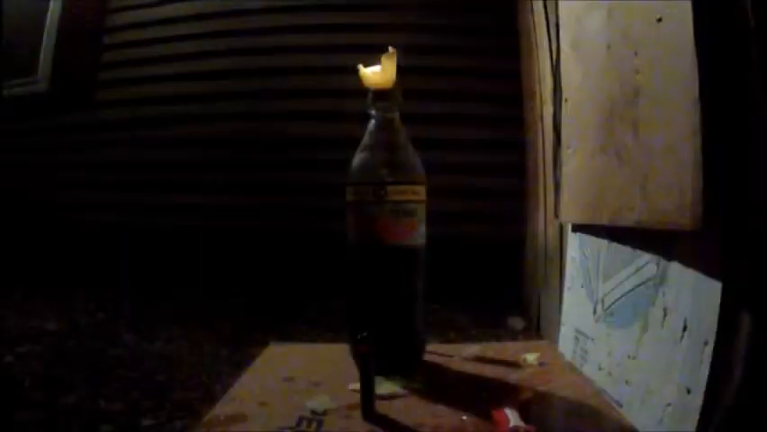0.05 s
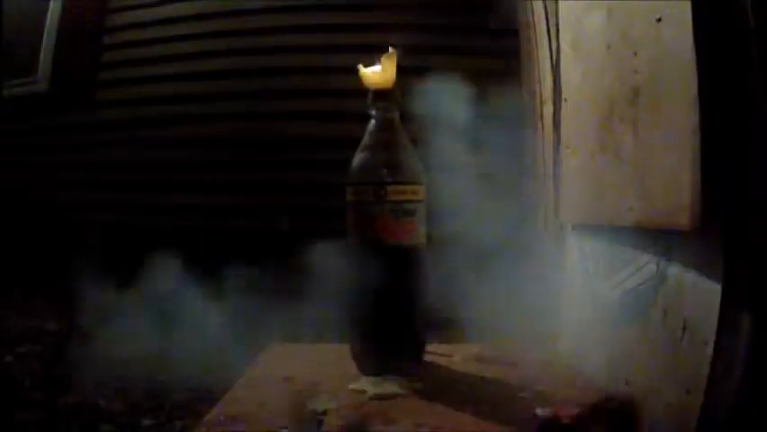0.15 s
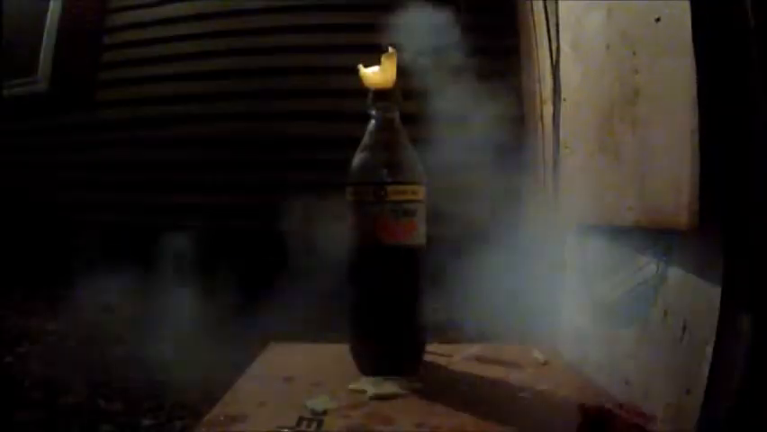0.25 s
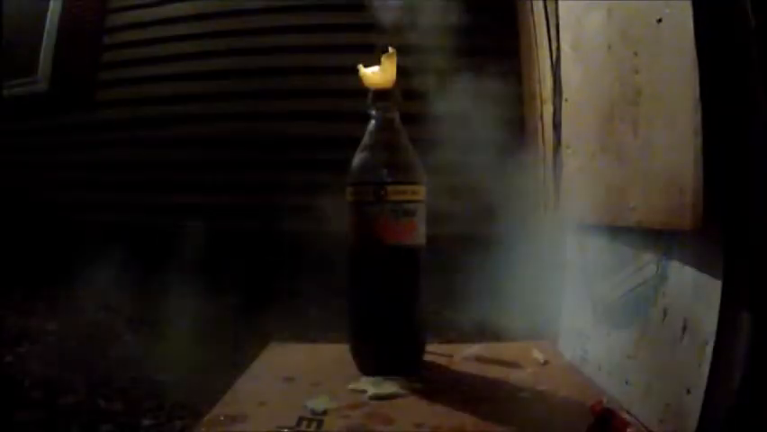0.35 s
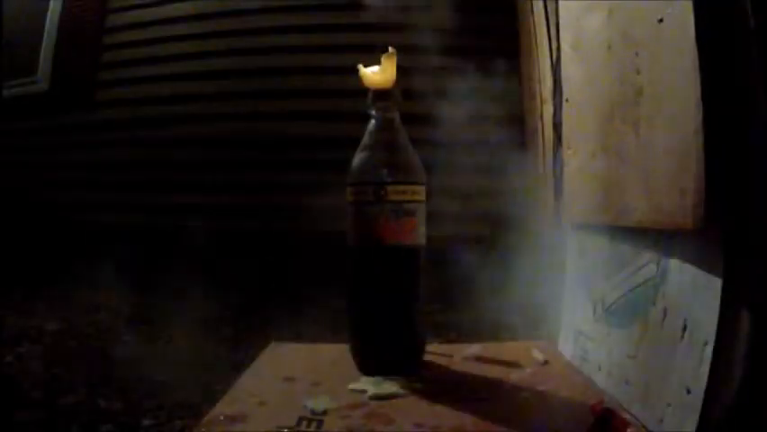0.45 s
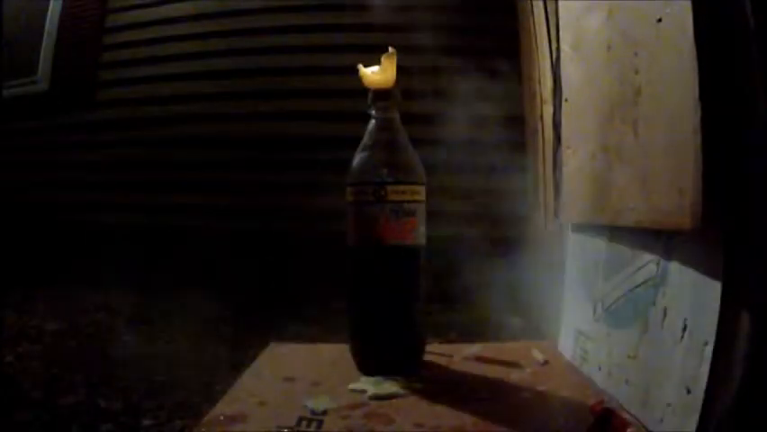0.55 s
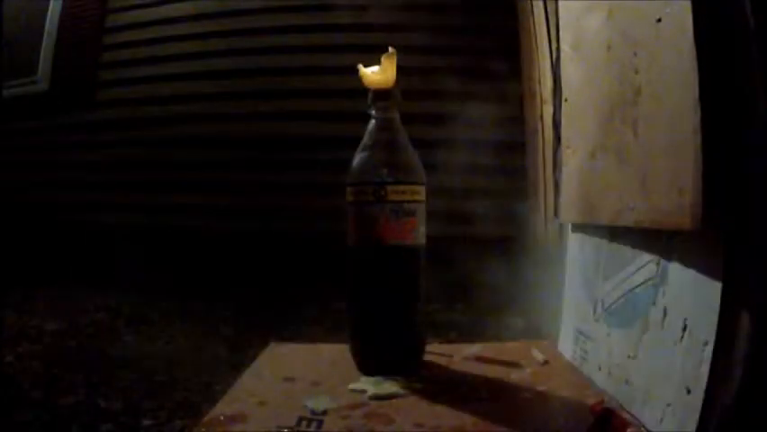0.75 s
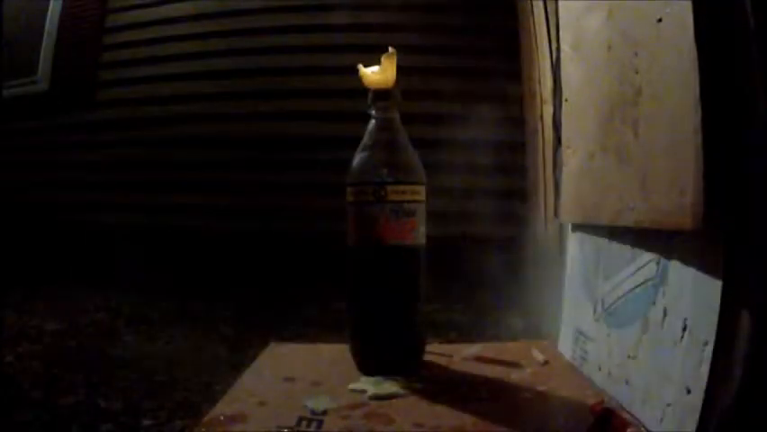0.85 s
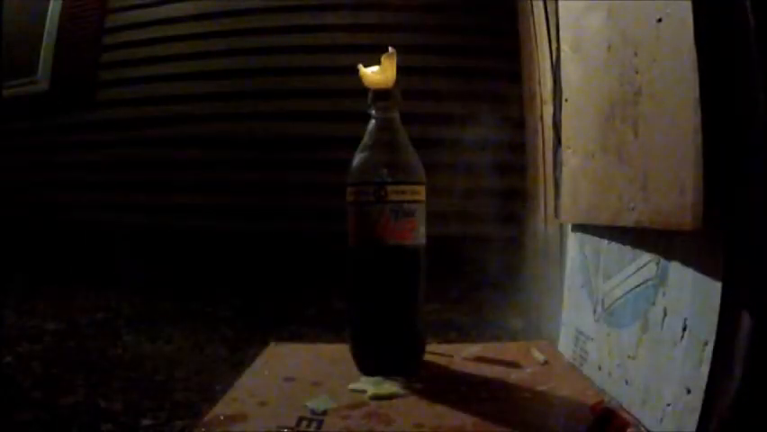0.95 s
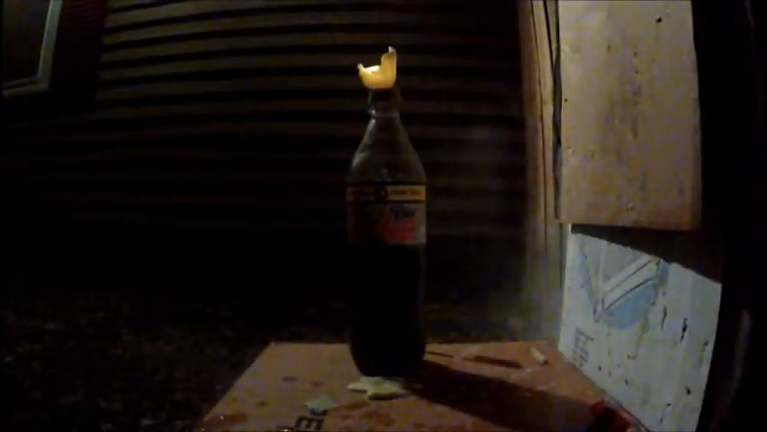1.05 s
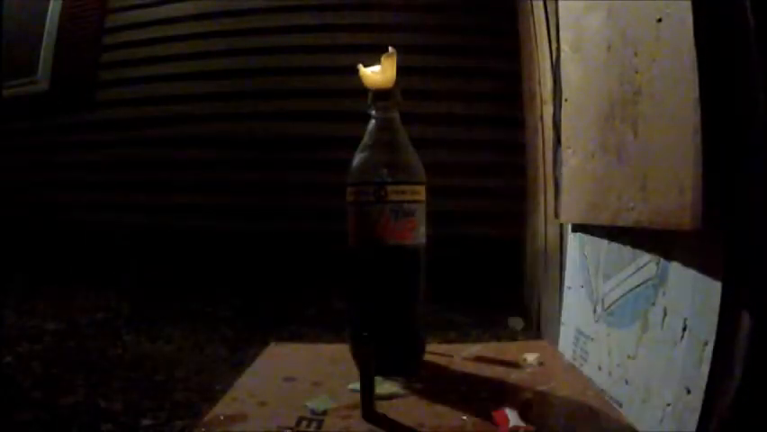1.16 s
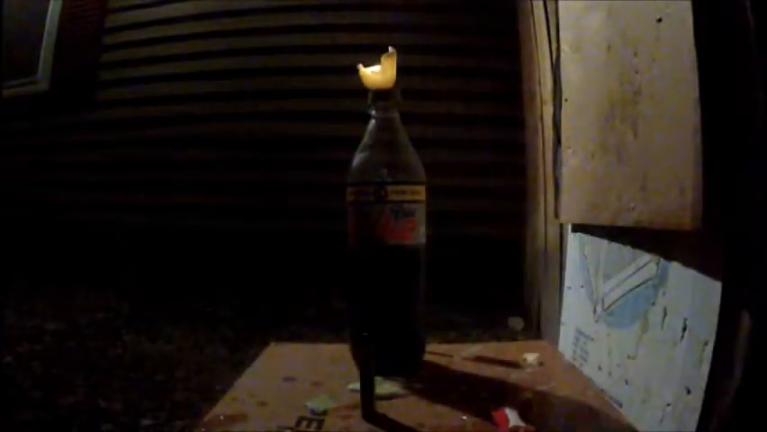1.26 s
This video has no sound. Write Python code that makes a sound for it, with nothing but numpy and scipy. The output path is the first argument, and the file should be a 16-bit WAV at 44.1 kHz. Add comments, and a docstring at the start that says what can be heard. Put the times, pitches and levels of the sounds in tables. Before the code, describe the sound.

A butane lighter bursts close by: gas starts hissing at about 0.2 seconds, and a sharp, loud pop follows almost at once. The hiss fades by 0.5 seconds while the plastic body knocks and rattles on a board, hardest around 0.4 to 0.5, settling by 0.6. Faint splinters tick afterwards, the last ringing briefly just after 1 second. A low distant hum lies underneath in the quiet yard.

```python
"""A butane lighter splits, hisses and bursts on a board, close by, at night, over a low distant hum.
At 0.18 s gas starts to jet from the split; it hisses for a third of a second.
At 0.24 s the case bursts with a push, a crack and two after-pulses; the body knocks and rattles to rest.
Small splinters tick among the knocks and afterwards; the last one rings briefly just after 1 s.
Near walls answer each sound, and a faint dull reverberation dies away in the yard."""
import sys
import numpy as np
from scipy import signal
from scipy.fft import rfft, irfft, next_fast_len
from scipy.io import wavfile
from scipy.ndimage import map_coordinates

SR = 44100
rng = np.random.default_rng(int(sys.argv[2]) if len(sys.argv) > 2 else 0)


def log_audio(samples):
    """Write samples as a 16-bit WAV file to the path given in sys.argv[1]."""
    # one column per channel
    frames = np.atleast_2d(samples).T
    # limit to full scale, then quantise
    limited = np.clip(frames, -1, 1)
    pcm = np.round(limited * 32767).astype(np.int16)
    wavfile.write(sys.argv[1], SR, pcm)


N = 57330


def amp(db):
    """Decibels to amplitude ratio."""
    return 10 ** (np.asarray(db) / 20)


def unit(x):
    """Normalisation to rms 1."""
    return x / np.sqrt(np.mean(x ** 2) + 1e-20)


def clock():
    """The time of each sample in seconds."""
    return np.arange(N) / SR


def since(start_s):
    """Time elapsed after an onset, zero before."""
    return np.maximum(clock() - start_s, 0)


def curve(rows):
    """Linear interpolation of (time_s, value) rows at each sample."""
    return np.interp(clock(), *np.transpose(rows))


def colour(spectrum, hz):
    """Spectral envelope: gain from (frequency_hz, level_db) rows on a log axis."""
    f, db = np.transpose(spectrum)
    return amp(np.interp(np.log(hz + 1), np.log(f + 1), db))


def filtered(x, response):
    """Linear filtering: the spectrum of x times a frequency response."""
    size = next_fast_len(N + SR // 2)
    return irfft(rfft(x, size) * response(np.fft.rfftfreq(size, 1 / SR)), size)[..., :N]


def noise(response):
    """Filtered white noise of rms 1."""
    return unit(filtered(rng.standard_normal(N), response))


def wobble(rate_hz):
    """Random modulation: a spline through rate_hz knots a second."""
    return map_coordinates(rng.standard_normal(2048), [clock() * rate_hz], mode="wrap")


def strike(t, t60, rise_s):
    """Exponential decay after a quick rise, peak 1."""
    shape = (1 - np.exp(-t / rise_s)) * np.exp(-np.log(1000) * t / t60)
    return shape / (shape.max() + 1e-20)


def thump(t, hz, t60, rise_s):
    """Damped oscillation that swells over the time of contact."""
    shape = (1 - np.exp(-t / rise_s)) * strike(t, t60, rise_s)
    return shape / (shape.max() + 1e-20) * np.sin(2 * np.pi * hz * t)


# partials of the hum: harmonic_number, level_db
HUM_PARTIALS = [(1, 0), (2, -19), (3, -24)]
# envelope of the hum: time_s, level_db
HUM_ENVELOPE = [(0, -39.5), (.12, -43), (.5, -41), (.8, -40.5), (1.03, -44), (1.14, -54.5), (1.21, -45)]
def distant_hum(pitch_hz=89.14, wander=0.0081):
    """A harmonic series wavers under random frequency and amplitude modulation."""
    phase = 2 * np.pi * np.cumsum(pitch_hz * (1 + wander * wobble(11))) / SR
    tone = sum(amp(db + 1.5 * wobble(8.9)) * np.sin(k * phase) for k, db in HUM_PARTIALS)
    return amp(curve(HUM_ENVELOPE)) * unit(tone)


def electronic_hiss(centre_hz=12070, width_hz=300):
    """Narrow-band noise, heard as a thin high whine."""
    return amp(-77) * noise(lambda f: np.exp(-((f - centre_hz) / width_hz) ** 2))


# spectrum of the night air: frequency_hz, level_db
AIR_SPECTRUM = [(20, -20), (40, -13.5), (62, 3), (90, -8), (135, -1.5), (200, -13), (300, -16.5),
                (430, -23.5), (620, -19), (760, -29), (950, -38), (1500, -42), (2400, -41), (4500, -48),
                (6000, -54.5), (8000, -51), (10500, -56), (14500, -54)]
def night_air():
    """Steady ambient noise, its power concentrated at low frequencies."""
    return amp(-45) * noise(lambda f: colour(AIR_SPECTRUM, f))


def side_rumble():
    """Decorrelation: faint low noise that makes the two sides differ."""
    spectrum = [(30, 7.5), (100, -11.5), (400, -22), (3000, -35), (12000, -45.5)]
    return amp(-64) * noise(lambda f: colour(spectrum, f))


# reflections from the near walls: delay_s, level_db
WALL_ECHOES = [(.0085, -19), (0.0123, -23.5), (0.03, -27)]
def yard(direct, tail_top_hz=750):
    """Early reflections add delayed copies; convolution with decaying noise adds dull reverberation."""
    echoes = filtered(direct, lambda f: sum(amp(db) * np.exp(-2j * np.pi * f * s) for s, db in WALL_ECHOES))
    tail = noise(lambda f: 1 / (1 + (f / tail_top_hz) ** 4)) * strike(clock(), t60=0.35, rise_s=0.024)
    passband_gain = np.linalg.norm(tail) * np.sqrt(SR / tail_top_hz)
    return direct + echoes + amp(-22) * signal.fftconvolve(direct, tail / passband_gain)[:N]


# modes of the board: pitch_hz, level_db, t60_s
BOARD_MODES = [(135, -5, .08), (189, -2, .10), (275, -6, .07), (335, -4, .08), (414, 0, .10),
               (505, -4, .07), (642, 0, .075), (717, -6, .06), (830, -11, .05), (960, -16, .04),
               (1310, -16, .04), (1615, -7, .055), (1725, -9, .05), (2920, -23, .04)]
def board(t, scatter_db=2):
    """Modal superposition: each excitation gives the board's modes new random weights."""
    gains = amp(scatter_db * rng.standard_normal(len(BOARD_MODES)))
    return sum(gain * amp(db) * thump(t, hz, t60, rise_s=.0006)
               for gain, (hz, db, t60) in zip(gains, BOARD_MODES))


# modes of the last splinter: pitch_hz, level_db, t60_s
PING_MODES = [(1050, -10, 0.056), (2035, -0.5, 0.032), (2146, -1.5, 0.032)]
def last_splinter(start_s=1.028):
    """Free vibration: the last piece rings briefly at its natural frequencies."""
    t = since(start_s)
    return amp(-45.5) * sum(amp(db) * thump(t, hz, t60, rise_s=0.00023) for hz, db, t60 in PING_MODES)


# ticks: start_s, level_db, t60_s, resonance_hz, board_ring_db
# The one at 0.2452 s is a sharp echo of the burst's crack; the rest are splinters snapping and landing.
TICKS = [(0.194, -24, 0.0053, 3060, -25), (0.1981, -33, 0.0065, 3420, -22), (0.2452, -20, .018, 3100, -21),
         (0.2817, -29, 0.0092, 3980, -27), (.4382, -30.5, 0.02, 4520, -27),
         (.5030, -43.5, 0.031, 6200, -21), (0.6152, -53, .015, 3030, -12), (0.746, -63.5, 0.034, 2800, -8),
         (0.856, -57, .04, 3945, -4), (0.8632, -44.5, 0.013, 4506, -8), (0.874, -47.5, .03, 3780, -29),
         (1.009, -55.5, .06, 3000, -11), (1.0228, -49.5, .03, 4000, -3), (1.0280, -47.5, 0.016, 3336, -33)]
# spectrum common to the ticks: frequency_hz, level_db
TICK_SPECTRUM = [(200, -11.5), (1000, -11), (1700, -10), (2400, 5), (4600, -1), (5900, -11.5), (7500, -0.5),
                 (10000, -7), (15000, -12.5)]
def ticks(peak_db=4.5, log_width=.25):
    """Impulse excitation: each tick is brief noise with a broad resonance and a ring of the board."""
    out = np.zeros(N)
    for start_s, db, t60, hz, ring_db in TICKS:
        t = since(start_s)
        resonance = lambda f: amp(peak_db * np.exp(-(np.log((f + 1) / hz) / log_width) ** 2))
        bright_noise = noise(lambda f: colour(TICK_SPECTRUM, f) * resonance(f))
        out += amp(db) * (strike(t, t60, rise_s=0.00045) * bright_noise + amp(ring_db) * board(t))
    return out


# thuds: start_s, level_db, pitch_hz, t60_s, ring_offset_db, rattle_offset_db # The one at 0.1932 s is a puff of
# gas just before the burst; those at 0.2412 and 0.2475 s are # after-pulses of the burst; the one at 0.528 s is
# the low thud of overload on the loudest knock. # The rest are the lighter's body knocking on the board.
THUDS = [(0.1932, -21.5, 260, 0.043, -2, -20), (.2412, -5, 600, .014, -7, -8),
         (.2475, -12, 621, 0.037, -3.5, -8), (0.258, -17, 190, 0.024, -7.5, -30),
         (.2690, -24, 403, 0.069, -3.5, -0.5), (.3110, -10, 324, 0.019, 10, -16.5),
         (.3150, -9, 172, 0.017, 3.5, 4), (0.3506, -9.5, 605, 0.011, -13, -8),
         (.3530, -17, 183, 0.046, -6.5, -9.5), (0.3546, -13.5, 382, 0.09, -7, -0.5),
         (.3640, -18.5, 427, 0.02, 0, 0), (0.3777, -17.5, 229.2, 0.02, -10, -17.5),
         (.3802, -9, 249.6, 0.022, -13, -16.5), (.4030, 0.5, 271.5, 0.012, -1.5, -5.5),
         (.4135, -18, 570, 0.055, -16.5, 9), (0.429, -18.5, 197.7, .035, -6, -5.5),
         (0.4424, -0.5, 621, 0.0099, -1, -4.5), (.4440, -7.5, 337, 0.043, -10.5, -8),
         (.4520, -10, 552, .03, -10.5, -1.5), (0.5264, 4.5, 409.8, 0.013, -14, -4),
         (.5280, -23.5, 70, 0.028, -13, -17), (.5400, -23, 1576, 0.013, -1, -1),
         (.5470, -25, 158, 0.075, -1, -7), (0.556, -23.5, 461, 0.016, 1.5, 1),
         (0.579, -21, 552, 0.017, 0.5, -2), (.5880, -35, 550, 0.029, 1.5, 9.5),
         (0.598, -24.5, 481, 0.024, -1.5, 0), (0.863, -46, 300, .03, -9, -9)]
# spectrum of hard plastic chattering at the contact: frequency_hz, level_db
RATTLE_SPECTRUM = [(60, -12), (300, 2.5), (800, 5), (1500, 2), (2200, -6.5), (2900, -5.5), (3600, -15),
                   (5800, -39.5), (8500, -19.5), (10500, -15), (11500, -1.5), (12550, -4), (13150, -15),
                   (14200, -13), (15500, -21)]
def thuds(ring_db=-18, rattle_db=-13.5):
    """Transient response: each thud is a damped thump, the board's ring and a plastic rattle."""
    out = np.zeros(N)
    body = noise(lambda f: colour(RATTLE_SPECTRUM, f))  # shared by every rattle
    for start_s, db, hz, t60, ring_offset_db, rattle_offset_db in THUDS:
        t = since(start_s)
        variation = amp(-4) * noise(lambda f: colour(RATTLE_SPECTRUM, f))
        chatter = unit(np.roll(body, round(start_s * SR)) + variation)
        rattle = amp(rattle_db + rattle_offset_db) * strike(t, t60=0.023, rise_s=.0007) * chatter
        ring = amp(ring_db + ring_offset_db) * board(t)
        out += amp(db) * (thump(t, hz, t60, rise_s=.0011) + ring + rattle)
    return out


# envelope of the escaping gas: time_s, level_db
JET_ENVELOPE = [(.18, -76.5), (.188, -40.5), (.196, -26), (.206, -33.5), (.23, -32.5), (.27, -39),
                (.305, -34), (.338, -41), (.43, -45), (.475, -57), (.505, -49.5), (.522, -68)]
# spectrum of the escaping gas: frequency_hz, level_db
JET_SPECTRUM = [(100, 1.5), (600, 9.5), (1100, -6), (2000, -3), (3050, -0.5), (3900, -2), (5000, -5),
                (6000, -18), (7300, -9), (9000, -6.5), (10800, -20), (13500, -14), (15000, -20)]
def gas_jet(sputter_db=2.5):
    """Jet noise: gas sputters out of the split and runs down as the tank empties."""
    level_db = curve(JET_ENVELOPE) + sputter_db * wobble(rate_hz=130)
    return amp(level_db) * noise(lambda f: colour(JET_SPECTRUM, f))


# spectrum of the crack: frequency_hz, level_db
CRACK_SPECTRUM = [(40, -10), (150, -1.5), (600, 3), (1100, 1), (2200, -3), (3600, -4.5), (4900, -3),
                  (5900, -17), (7200, -6.5), (8800, -5.5), (11000, -15), (15500, -8)]
# modes of the tearing case: pitch_hz, level_db, t60_s
CASE_MODES = [(910, 1, 0.016), (1430, -4.5, .04), (2220, 1, 0.045), (2923, -1.5, .045), (3087, -4.5, 0.054),
              (3450, -1, 0.036), (3710, -0.5, 0.029), (4940, -1.5, .025), (8400, -7.5, .03),
              (8570, -9, .04)]
def burst(start_s=.2355, crack_delay_s=.0024):
    """Sudden pressure release: a push shakes the board, then a bright crack rings the plastic case."""
    t, torn = since(start_s), since(start_s + crack_delay_s)
    shake = board(t) * strike(t, t60=.06, rise_s=0.00016)
    push = amp(3.5) * thump(t, hz=380, t60=.013, rise_s=.0002) + amp(-9) * shake
    puff = amp(-4) * thump(t, hz=147, t60=0.02, rise_s=0.00045)  # the freed gas expanding
    crack = strike(torn, t60=0.017, rise_s=.0004) * noise(lambda f: colour(CRACK_SPECTRUM, f))
    case = sum(amp(db) * thump(torn, hz, t60, rise_s=.0002) * rng.choice([-1, 1])
               for hz, db, t60 in CASE_MODES)
    return amp(-7) * crack + amp(-18.5) * case - push + puff


def microphone(x, notch_hz=12000, width_hz=380, low_cut_hz=45):
    """Transducer response: a narrow dip in the treble and a first-order bass roll-off."""
    notch = lambda f: (notch_hz ** 2 - f * f) / (notch_hz ** 2 - f * f + 1j * f * width_hz)
    return filtered(x, lambda f: notch(f) ** 2 * 1j * f / (low_cut_hz + 1j * f))


def scene():
    """Mid-side superposition: all is heard in the centre except a faint rumble."""
    lighter = burst() + gas_jet() + thuds() + ticks() + last_splinter()
    mid = microphone(yard(lighter)) + distant_hum() + electronic_hiss() + night_air()
    side = side_rumble()
    return np.array([mid + side, mid - side])


def record(dry, end_s=1.214, top_hz=15250):
    """Overload and band limiting: the loudest peaks clip, and a steep low-pass follows."""
    fade_out = np.clip((end_s - clock()) / .003, 0, 1)
    clipped = np.clip(dry, -1, 1)
    return filtered(clipped * fade_out, lambda f: 1 / np.sqrt(1 + (f / top_hz) ** 120))


dry = scene()
out = record(dry)
log_audio(out)
```